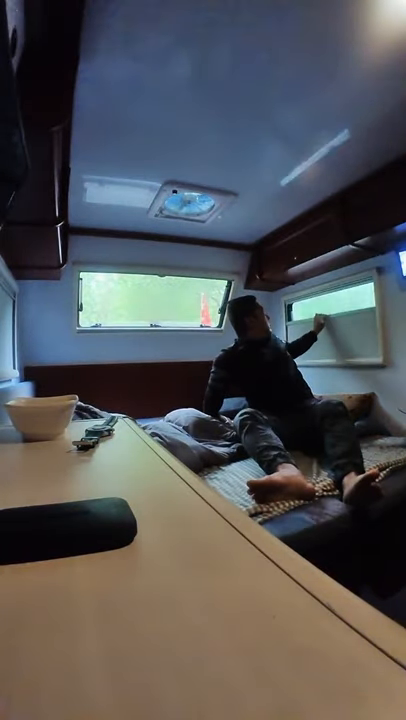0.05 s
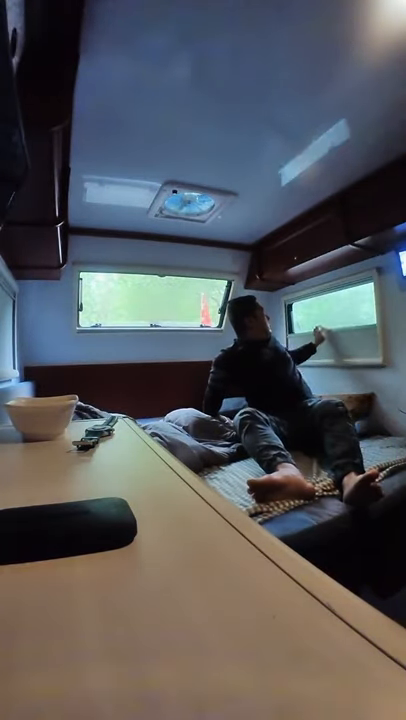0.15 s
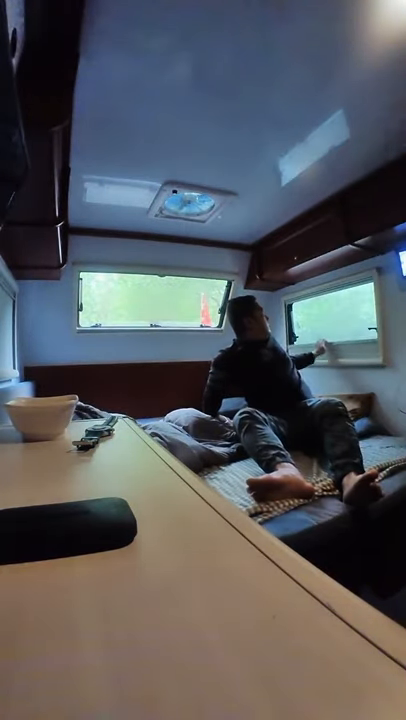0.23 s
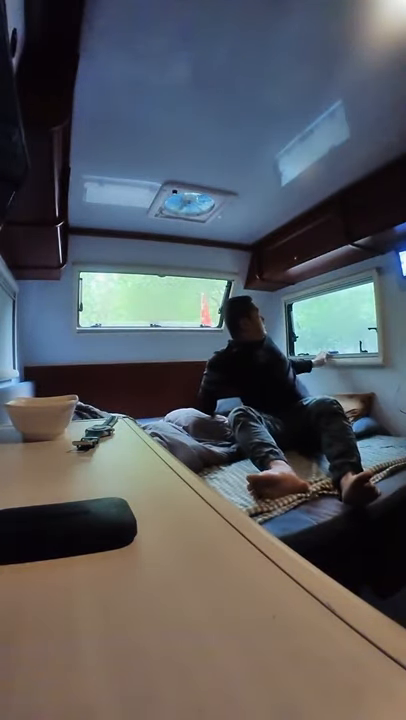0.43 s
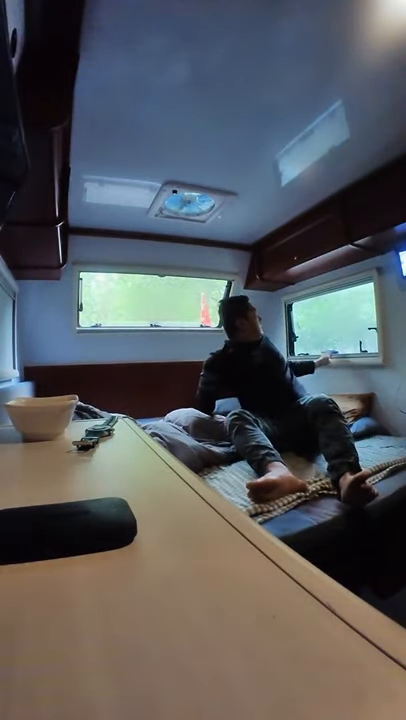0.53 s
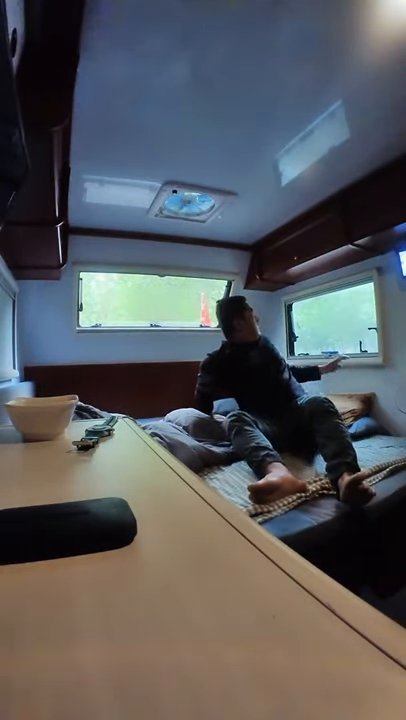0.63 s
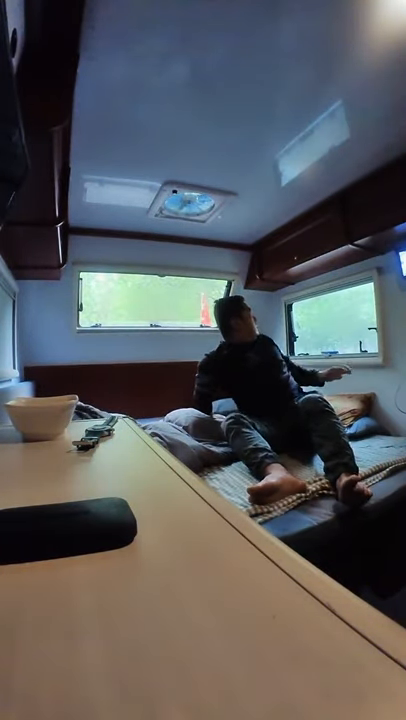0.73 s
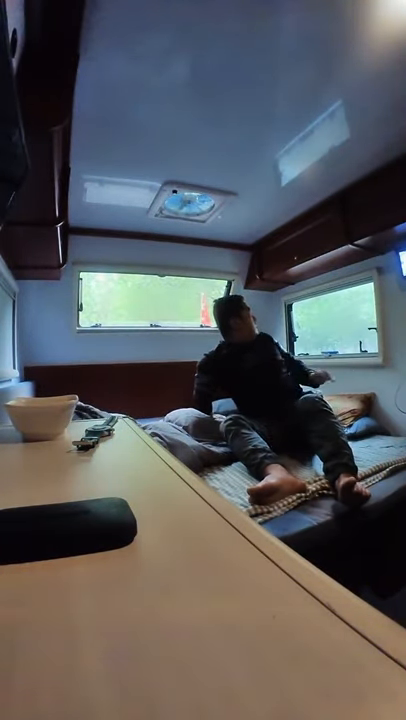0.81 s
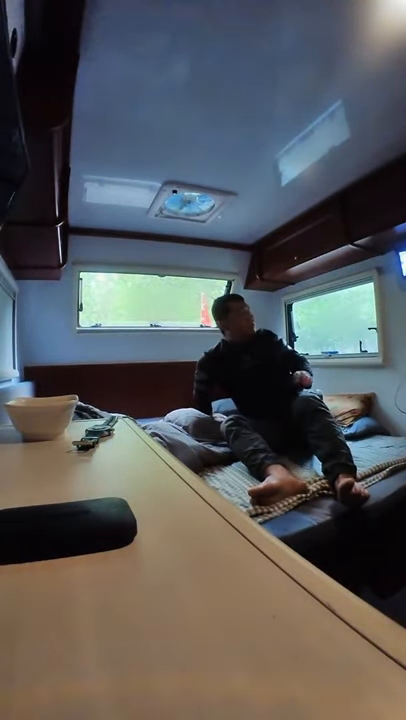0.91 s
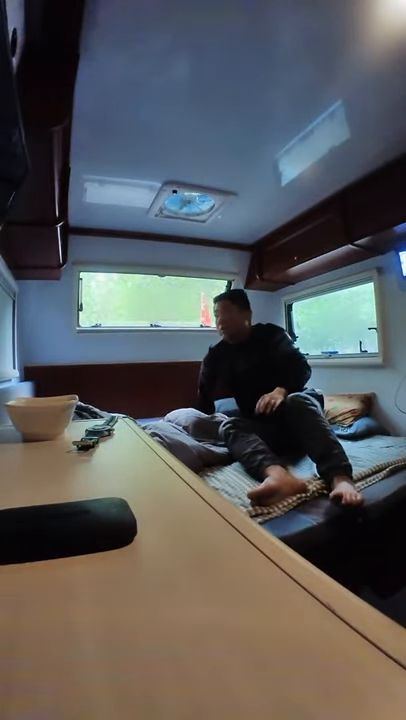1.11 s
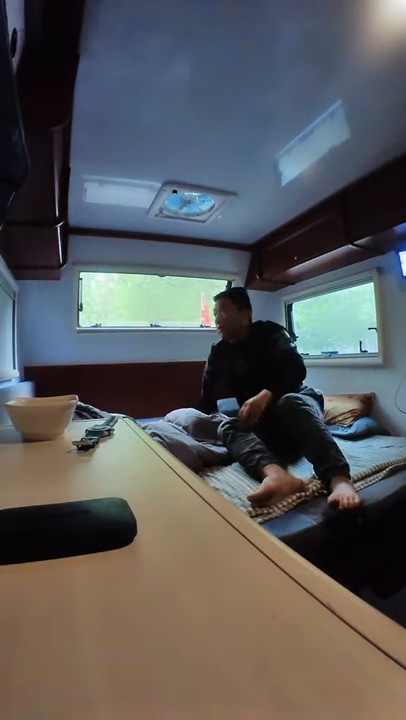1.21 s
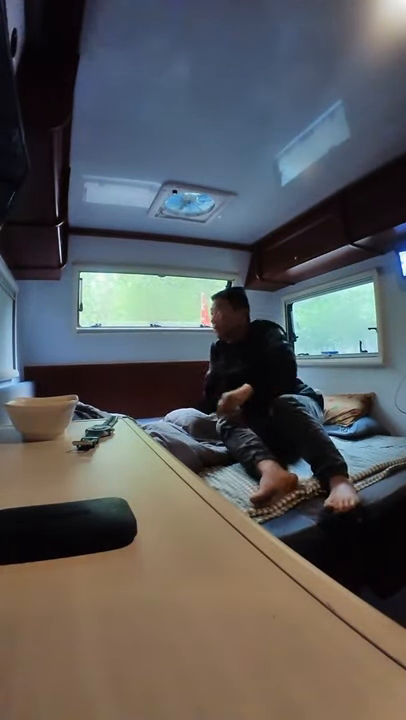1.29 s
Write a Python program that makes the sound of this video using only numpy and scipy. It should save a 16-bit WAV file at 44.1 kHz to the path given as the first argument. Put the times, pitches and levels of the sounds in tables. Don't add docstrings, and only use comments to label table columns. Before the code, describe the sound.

Inside a small quiet camper, a blind is pushed along its rail, rasping, catching and jolting the wall, then bangs into the end stop; afterwards soft cloth rustle, tiny creaks and very faint distant birds.

```python
import sys
import numpy as np
from scipy import signal
from scipy.io import wavfile

SR = 44100
rng = np.random.default_rng(int(sys.argv[2]) if len(sys.argv) > 2 else 0)


def ratio(d):
    e = np.asarray(d, float) / 20
    return 10 ** e


def wav_record(signal):
    frames = np.transpose(np.atleast_2d(signal))
    bounded = np.clip(frames, -1, 1)
    quanta = np.round(bounded * 32767).astype(np.int16)
    wavfile.write(sys.argv[1], SR, quanta)


N = 59535
T = np.arange(N) / SR

# pitch in Hz, level in dB per Hz.
AIR_COLOUR = [(25, -6.5), (100, -2.5), (250, -7.5), (600, -15), (3000, -23.5), (6500, -29), (9000, -37),
              (15700, -48.5)]
# time in seconds, level in dB.
BEDDING_MOVES = [
    (.6, -75.5),
    (.8, -74),
    (.95, -64),
    (1.06, -64),
    (1.15, -63),
    (1.35, -63.5),
]
# pitch in Hz, level in dB per Hz.
CLOTH_COLOUR = [(180, -38), (300, -5.5), (620, -2.5), (680, -17.5), (1380, -3.5), (2270, -12.5), (3600, -9),
                (12000, -34), (15600, -64.5), (22000, -120)]
# start in seconds, length in seconds, level in dB, pitch in Hz, width in Hz.
CHIRPS = [
    (.95, .1, -75, 3700, 200),
    (.955, .015, -71, 4050, 80),
    (1.108, .022, -64, 4390, 160),
    (1.135, .013, -67, 3590, 70),
    (1.18, .015, -69, 3650, 60),
    (1.255, .02, -68, 3620, 60),
    (1.32, .012, -67, 3680, 70),
]
# start in seconds, length in seconds, level in dB, pitch in Hz, width in Hz.
CREAKS = [(.572, .009, -52.5, 2090, 150), (.581, .014, -55, 2040, 200), (.577, .018, -61, 1040, 160),
          (.98, .04, -70, 1400, 150), (1.105, .015, -68, 1450, 150), (1.128, .03, -59.5, 1380, 130),
          (1.158, .025, -63, 1420, 130), (1.185, .04, -63, 1380, 110), (1.222, .05, -66, 1420, 130),
          (1.272, .04, -69, 1380, 130), (.594, .01, -62, 2000, 300), (1.31, .036, -60, 1350, 100)]
# start in seconds, peak in dB, pitch in Hz, time to fall 60 dB in seconds.
JOLTS = [(.0, -22.5, 238, 0.016), (.008, -29.5, 349, 0.084), (0.011, -29.5, 233.6, 0.054),
         (0.138, -29.5, 109, 0.072), (0.204, -25, 121, 0.032), (.288, -17, 119.8, 0.057),
         (0.313, -25, 114, 0.086), (0.326, -21, 121.7, 0.093), (.434, -8.5, 114.8, 0.09),
         (0.443, -10.5, 200, 0.041), (0.476, -22.5, 150, 0.073), (0.494, -25, 112, 0.04),
         (.505, -20.5, 109.6, 0.031), (0.343, -26, 159, 0.021), (.417, -25.5, 252.4, .04),
         (0.536, -27.5, 182.5, 0.047), (0.573, -33, 132.5, 0.071), (0.585, -35, 232.3, 0.029)]
# start in seconds, length in seconds, level in dB, pitch in Hz, width in Hz.
RAIL_SINGS = [(.005, .035, -41, 470, 120), (.115, .04, -44, 790, 25), (.21, .035, -41, 1860, 60),
              (.25, .035, -39, 1850, 60), (.245, .055, -39, 660, 45), (.31, .05, -44, 670, 40),
              (.372, .016, -35, 690, 60), (.39, .04, -41, 690, 50), (.352, .034, -42, 1880, 60),
              (.21, .02, -42, 1100, 60), (.245, .03, -40, 1270, 80), (.255, .06, -42, 1060, 50),
              (.325, .025, -40, 1140, 70), (.325, .025, -41, 1550, 70), (.395, .03, -42, 1100, 80),
              (.06, .04, -47, 2750, 200), (.53, .022, -55, 700, 300)]
# start in seconds, peak in dB, ringing pitch in Hz.
SNAGS = [
    (0.1056, -28, 2960),
    (0.195, -34, 2920),
    (0.2357, -17.5, 2850),
    (0.2645, -31, 2950),
    (0.3164, -33, 2840),
    (0.3347, -21.5, 2870),
]
SCRATCH_BAND = [3200, 8500]
# time in seconds, friction in dB, share into the frame in dB, shake of the wall in dB.
PUSH = [
    (0.0, -44.5, -7, -18.5),
    (0.068, -44, -5.5, -40.5),
    (0.162, -42.5, -7, -32),
    (0.264, -39, -6, -30.5),
    (0.286, -41, -2.5, -34),
    (0.4, -38.5, -6.5, -31.5),
    (0.424, -37, -2.5, -26.5),
    (0.43, -32, -2, -26.5),
]
# pitch in Hz, level in dB per Hz.
RAIL_COLOUR = [(240, -41), (400, -12), (664, -7), (875, -11.5), (1100, -5.5), (2100, -5), (2940, -9),
               (6430, -13), (15700, -57)]
# pitch in Hz, width in Hz, level in dB.
FRAME_RESONANCES = [(642, 31, -2.5), (1087, 120, -5.5), (1209, 65, -1.5), (1586, 80, -3), (1870, 110, -2),
                    (2460, 290, -3.5), (2870, 170, -1.5), (4330, 140, -9), (4880, 92, -5), (6160, 52, -8.5)]
# pitch in Hz, level in dB per Hz.
WALL_COLOUR = [(15, -52), (25, -31), (112, 1), (194, -3.5), (260, -0.5), (377, -8), (512, -17.5),
               (600, -13.5), (780, -48), (1320, -120)]
# time in seconds, peak in dB.
CONTACTS = [
    (0.4345, -13.5),
    (0.4348, -8),
    (0.4358, -1.5),
    (0.4387, 1),
    (.4420, -4),
    (.4447, -8.5),
    (0.45, -12.5),
    (.4585, -18),
    (0.4709, -23),
]
# pitch in Hz, level in dB, time to fall 60 dB in seconds.
BAR_MODES = [(1775, 1, .03), (655, -8, .12), (742, -8, .1), (1050, -10, .1), (1160, -12, .07),
             (1378, -10, .1), (1510, -2, .045), (1685, 4, .04), (1884, -5, .07), (2180, -3, .05),
             (2492, -4, .05), (2860, -9, .06), (3478, -3, .05), (4185, -10, .04)]
# pitch in Hz, level in dB per Hz.
CRACK_COLOUR = [(180, -42.5), (300, -11), (900, -10), (1620, -4), (2940, -2), (3770, -14), (4240, -7.5),
                (4530, -14.5), (6450, -17), (7400, -24), (15700, -43.5)]
# pitch in Hz, level in dB per Hz.
TAIL_COLOUR = [(56, -30.5), (70, -8), (110, -5), (243, -6.5), (397, -18), (664, -9), (1260, -14),
               (2440, -13.5), (6390, -24.5), (15700, -50)]

STOP_S, STOP_FADE_S = 0.436, 0.0028
GRAINS_PER_S, GRAIN_SPREAD_DB = 11000, 4
DULL_START_S, DULL_START_HZ, DULL_START_DB, DULL_FADE_S = 0.056, 6300, -10, 0.012
SNAG_S, SNAG_T60_S, SCRATCH_STRETCH = 0.0033, 0.0225, 1.6
SLAM_S, CRACK_RISE_S, CRACK_HOLD_S, CRACK_T60_S = 0.432, 0.002, 0.0073, 0.031
TAIL_BASS_T60_S, TAIL_T60_S, TAIL_TREBLE_T60_S = 0.36, 0.25, 0.2
TAIL_CUT_S, CUT_DB_PER_S, CUT_TILT = 0.4965, 328, 0.2
REBOUND_S, REBOUND_WIDTH_S, REBOUND_DB, REBOUND_HZ = 0.478, 0.011, 3, 2800


def rms_one(x):
    return x / np.sqrt(np.mean(x ** 2) + 1e-20)


def in_time(rows):
    s, *columns = np.transpose(rows)
    return [np.interp(T, s, column) for column in columns]


def drift(rate):
    r = np.exp(-80 * np.pi * rate / SR)
    slow = signal.lfilter([1], [1, -2 * r, r * r], rng.standard_normal(N // 40 + 2002))
    slow = slow[2000:]
    return np.interp(np.arange(N) / 40, np.arange(len(slow)), rms_one(slow))


def ring(x, hz, t60):
    r = ratio(-60 / (t60 * SR))
    w = 2 * np.pi * hz / SR
    return signal.lfilter([0, np.sin(w)], [1, -2 * r * np.cos(w), r * r], x + 1e-18)


def resonance(x, hz, width_hz):
    r = np.exp(-np.pi * width_hz / SR)
    w = 2 * np.pi * hz / SR
    return signal.lfilter([(1 - r * r) / 2, 0, (r * r - 1) / 2], [1, -2 * r * np.cos(w), r * r], x)


def bands(source, colour, patchy_db):
    hz, db = np.transpose(colour)
    edges = 22 * 2 ** np.arange(0, 9.7, 1 / 3)
    centres = np.sqrt(edges[1:] * edges[:-1])
    level_db = np.interp(np.log(centres), np.log(hz), db, left=db[0] - 26.5)
    together = drift(21)
    out = []
    for k in range(len(centres)):
        sos = signal.butter(2, edges[k:k + 2], "band", fs=SR, output="sos")
        flicker_db = patchy_db * (0.097 * together + drift(49))
        out.append(ratio(level_db[k] + flicker_db) * signal.sosfilt(sos, source[k % 2]))
    out = np.array(out)
    return centres, out / np.sqrt(np.mean(out.sum(axis=0) ** 2))


def noise(colour, patchy_db):
    return bands(rng.standard_normal((2, N)), colour, patchy_db)[1].sum(axis=0)


def rough_tones(rows):
    out, white, waver = np.zeros(N), rng.standard_normal(N), drift(40)
    for s, length, db, hz, width_hz in rows:
        shape = np.clip(np.minimum(T - s, s + length - T) / 0.004 + 0.5, 0, 1)
        rough = rms_one(resonance(resonance(white, hz, width_hz), hz, width_hz))
        steady = np.sin(2 * np.pi * np.cumsum(hz + 0.35 * width_hz * waver) / SR)
        tone = shape * (rough + 1.08 * steady)
        out += ratio(db) * tone / np.sqrt(np.sum(tone ** 2) / np.sum(shape ** 2))
    return out


def cabin_air():
    return ratio(-59) * noise(AIR_COLOUR, patchy_db=1.5)


def bedding():
    return ratio(in_time(BEDDING_MOVES)[0]) * noise(CLOTH_COLOUR, patchy_db=2.6)


def far_birds():
    return rough_tones(CHIRPS)


def bunk_creaks():
    return rough_tones(CREAKS)


def wall_jolts():
    out = np.zeros(N)
    for s, db, hz, t60 in JOLTS:
        t = np.maximum(T - s, 0)
        body = np.sin(2 * np.pi * hz * t) + 0.39 * np.sin(4 * np.pi * hz * t)
        rise = 1 - np.exp(-t / 0.0026)
        out += rise * ratio(db + 2 - 60 * t / t60) * body
    return out


def rail_singing():
    return rough_tones(RAIL_SINGS)


def snags():
    out, white = np.zeros(N), rng.standard_normal(N)
    sos = signal.butter(2, SCRATCH_BAND, "band", fs=SR, output="sos")
    scratch = signal.sosfilt(sos, noise(RAIL_COLOUR, patchy_db=0))
    for s, db, hz in SNAGS:
        t = np.maximum(T - s, 0) / SNAG_S
        burst = 6 * t * np.exp(-2.2 * t)
        body = ring(burst * white, hz, SNAG_T60_S)
        t_scratch = t / SCRATCH_STRETCH
        scrape = 2.29 * t_scratch * np.exp(-2 * t_scratch) * scratch
        out += ratio(db) * (ratio(-0.5) * body / np.abs(body).max() + ratio(-4) * scrape)
    return out


def friction_grains():
    sizes = ratio(GRAIN_SPREAD_DB * np.minimum(rng.exponential(1, (2, N)), 5))
    signs = rng.choice([-1, 1], (2, N))
    return sizes * signs * (rng.random((2, N)) < GRAINS_PER_S / SR)


def rail_hiss(grains):
    centres, rail = bands(grains, RAIL_COLOUR, patchy_db=2.0)
    slow = np.clip(0.5 - (T - DULL_START_S) / DULL_FADE_S, 0, 1)
    dull_db = DULL_START_DB * np.outer(centres > DULL_START_HZ, slow)
    return (rail * ratio(dull_db)).sum(axis=0)


def frame_ringing(grains):
    out = np.zeros(N)
    for k, (hz, width_hz, db) in enumerate(FRAME_RESONANCES):
        once = resonance(grains[k % 2], hz, 2 * width_hz)
        twice = rms_one(resonance(once, hz, 2 * width_hz))
        out += ratio(db + 1.8 * drift(20)) * twice * np.sqrt(width_hz)
    return rms_one(out)


def slide():
    friction_db, frame_db, wall_db = in_time(PUSH)
    grains = friction_grains()
    hiss = ratio(friction_db + 4.5) * rail_hiss(grains)
    frame = ratio(friction_db + frame_db + 10) * frame_ringing(grains)
    wall_wakes = np.clip(T / 0.1, 0.25, 1)
    wall = wall_wakes * ratio(wall_db - 4.5) * noise(WALL_COLOUR, patchy_db=2.5)
    moving = np.exp(-np.maximum(T - STOP_S, 0) / STOP_FADE_S)
    return moving * (hiss + frame + wall)


def struck_bar():
    s, db = np.transpose(CONTACTS)
    out = np.zeros(N)
    for hz, level_db, t60 in BAR_MODES:
        strength = ratio(db + level_db - 13 + rng.normal(0, 2, len(s)))
        clicks = np.zeros(N)
        clicks[(s * SR).astype(int)] = strength * rng.choice([-1, 1], len(s))
        out += ring(clicks, hz, t60)
    return out


def crack():
    fall_s = np.maximum(T - SLAM_S - CRACK_RISE_S - CRACK_HOLD_S, 0)
    return ratio(-10 - 60 * fall_s / CRACK_T60_S) * noise(CRACK_COLOUR, patchy_db=4.2)


def cabin_tail(cut_db):
    hz, tail = bands(rng.standard_normal((2, N)), TAIL_COLOUR, patchy_db=-0.4)
    t60 = np.where(hz < 3900, TAIL_T60_S, TAIL_TREBLE_T60_S)
    t60 = np.where(hz < 400, TAIL_BASS_T60_S, t60)[:, None]
    tail_db = -17.5 - 60 * np.maximum(T - SLAM_S, 0) / t60
    tail_db = tail_db + np.outer((hz / 3000) ** CUT_TILT, cut_db)
    rebound_colour = np.exp(-np.log2(hz / REBOUND_HZ) ** 2)
    rebound_time = np.exp(-((T - REBOUND_S) / REBOUND_WIDTH_S) ** 2)
    tail_db = tail_db + REBOUND_DB * np.outer(rebound_colour, rebound_time)
    return (ratio(tail_db) * tail).sum(axis=0)


def slam():
    rise = np.clip((T - SLAM_S) / CRACK_RISE_S, 0, 1) ** 2
    cut_db = -CUT_DB_PER_S * np.maximum(T - TAIL_CUT_S, 0)
    hit = struck_bar() + rise * crack()
    return hit * ratio(cut_db) + rise * cabin_tail(cut_db)


def scene():
    background = cabin_air() + bedding() + far_birds() + bunk_creaks()
    blind = wall_jolts() + rail_singing() + snags() + slide() + slam()
    return (background + blind)[None]


def band_limit(x):
    return signal.sosfilt(signal.butter(12, 15860, fs=SR, output="sos"), x)


def record(dry):
    x = 1.307 * np.tanh(dry / 1.289)
    x = signal.sosfilt(signal.cheby2(12, 70, 16400, fs=SR, output="sos"), x)
    x = signal.sosfilt(signal.butter(2, 52, "high", fs=SR, output="sos"), x)
    return band_limit(x)


dry = scene()
out = record(dry)
wav_record(out)
```